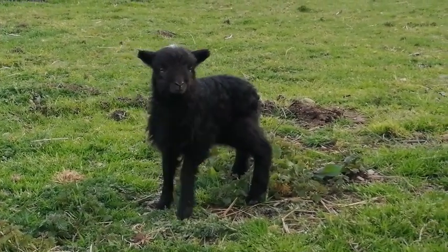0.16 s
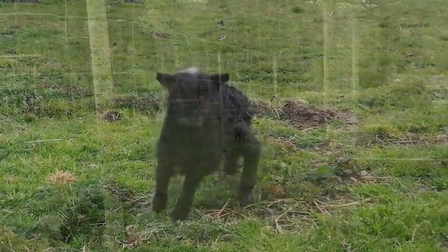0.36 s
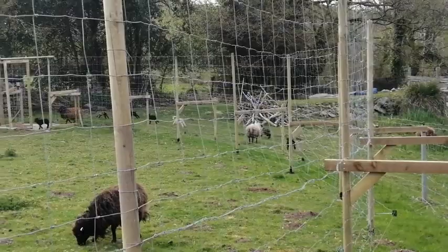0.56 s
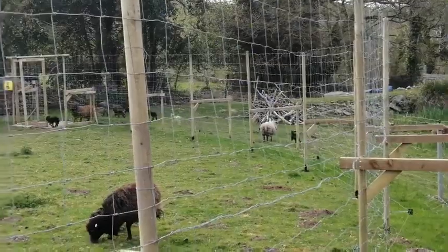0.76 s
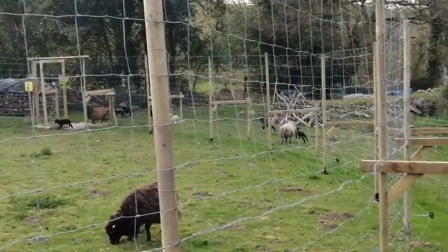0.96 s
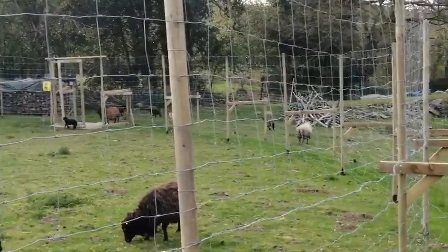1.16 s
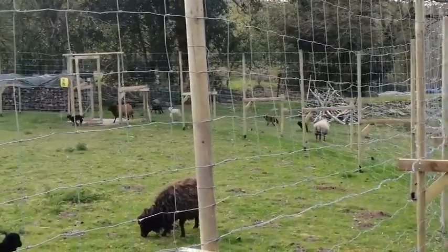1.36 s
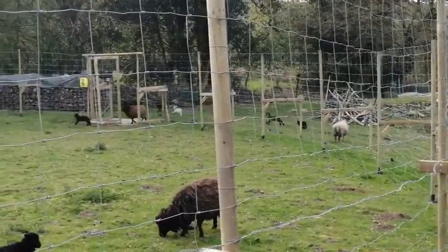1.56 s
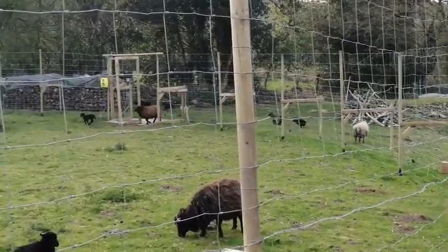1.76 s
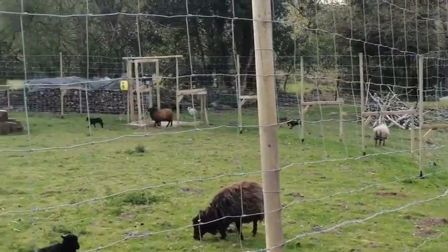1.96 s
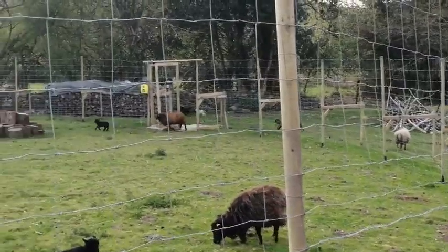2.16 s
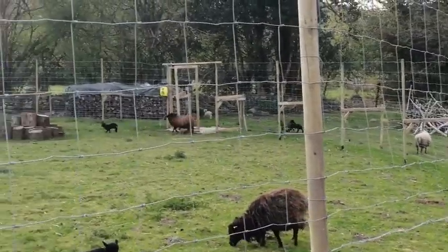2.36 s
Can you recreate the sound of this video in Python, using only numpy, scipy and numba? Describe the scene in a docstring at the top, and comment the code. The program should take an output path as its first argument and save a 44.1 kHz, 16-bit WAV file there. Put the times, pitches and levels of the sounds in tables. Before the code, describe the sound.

A lamb bleats once close to the microphone from about 0.2 to 1 second, a fast quavering call that starts rough and clears. From 1.1 seconds to the end at 2.5, two distant sheep answer faintly, overlapping. A small bird sings thin falling whistles from 1.3 seconds, with four quick repeated notes between 1.8 and 2.3. Soft microphone bumps and a quiet outdoor rush and hiss lie underneath.

```python
"""A lamb close to the microphone in a pasture gives one long quavering bleat: pulses of its vocal folds
ring in chest and mouth under a throat squeal, swelling and sagging about thirteen times a second.
Then two sheep answer faintly from far off and a small bird sings falling whistles from the trees.
Soft low bumps of the hand-held microphone sit on a quiet outdoor rush and hiss."""
import sys
import numpy as np
from scipy import signal
from scipy.fft import rfft, irfft, next_fast_len
from scipy.io import wavfile
from scipy.ndimage import map_coordinates
from numba import njit

SR = 44100
rng = np.random.default_rng(int(sys.argv[2]) if len(sys.argv) > 2 else 0)


def int16_out(signal):
    """Quantize to a 16-bit WAV file."""
    q = np.round(np.clip(np.atleast_2d(signal).T, -1, 1) * 32767)
    wavfile.write(sys.argv[1], SR, q.astype(np.int16))


N = 112455


def amp(db):
    return 10 ** (np.asarray(db) / 20)


def unit(x):
    return x / np.sqrt(np.mean(x ** 2) + 1e-20)


def clock():
    return np.arange(N) / SR


def bell(centre, width):
    """A smooth hump in time, down to 1/e at width seconds from its centre."""
    return np.exp(-((clock() - centre) / width) ** 2)


def curves(rows, t):
    """Each column after the first, read at times t."""
    times, *columns = np.transpose(rows)
    return [np.interp(t, times, column) for column in columns]


def wobble(rate):
    """A smooth random curve, rate knots a second."""
    return map_coordinates(rng.standard_normal(int(N * rate / SR) + 4), [clock() * rate])


def filtered(x, response):
    """x with its spectrum multiplied by response(hz)."""
    size = 2 * next_fast_len(N)
    return irfft(rfft(x, size) * response(np.fft.rfftfreq(size, 1 / SR)), size)[:N]


def colour(x, points):
    """Causal filter through (frequency [Hz], gain [dB]) points; the result has rms 1."""
    def response(hz):
        knots, db = np.transpose(points)
        cepstrum = irfft(np.log(amp(np.interp(np.log(hz + 1), np.log(knots), db))))
        half = len(cepstrum) // 2
        cepstrum[1:half] *= 2
        cepstrum[half + 1:] = 0
        return np.exp(rfft(cepstrum))
    return unit(filtered(x, response))


def noise(spectrum):
    return colour(rng.standard_normal(N), spectrum)


def echo(x, t60):
    """A diffuse outdoor tail that falls 60 dB in t60 seconds."""
    t = np.arange(SR // 2) / SR
    tail = rng.standard_normal(len(t)) * amp(-60 * t / t60) * (t > .004)
    return signal.fftconvolve(x, tail / np.linalg.norm(tail))[:N]


def pasture():
    """All round the microphone: a low outdoor rush, an uneven rumble and a high hiss."""
    # spectra of rush, hiss and rumble (frequency [Hz], gain [dB])
    rush_spectrum = [(25, -16), (50, -12.5), (100, -4), (170, -2.5), (270, 1.5), (400, -3), (600, -0.5),
                     (900, -6), (1200, -10), (1800, -11), (2500, -9), (3300, -7.5), (3900, -16),
                     (5000, -40)]
    hiss_spectrum = [(2000, -26.5), (3300, 0.5), (4000, -4.5), (4800, 0.5), (5700, 7), (6600, 3.5),
                     (7400, -13.5), (7900, -28.5)]
    rumble_spectrum = [(15, -3.5), (45, -10), (100, -6.5), (200, -20), (500, -57.5)]
    # level of the background rush and hiss: duller for the first 0.17 s, then the hiss steps up
    # and drifts gently (time [s], relative level [dB])
    rush_level = [(0, -49.5), (.17, -49), (.3, -46), (.85, -48.5), (1.05, -49), (1.25, -49.5), (1.6, -47),
                  (2.0, -48.5), (2.3, -48.5), (2.46, -47.5), (2.55, -47.5)]
    hiss_level = [(0, -65), (.16, -66.5), (.3, -56.5), (1.05, -57.5), (1.35, -54), (2.2, -56),
                  (2.55, -55.5)]
    rush = noise(rush_spectrum) * amp(curves(rush_level, clock())[0] - 4 + .92 * wobble(10.16))
    rumble = noise(rumble_spectrum) * amp(-74 + 4 * wobble(14))
    hiss = noise(hiss_spectrum) * amp(curves(hiss_level, clock())[0] + 1.2 * wobble(13))
    return rush + rumble + hiss


def microphone_bumps():
    """The hand on the microphone: soft low thuds of a few cycles, and dull rustles."""
    # thuds (time [s], frequency [Hz], half length [s], level [dB])
    bumps = [(0.185, 45, 0.016, -66), (0.519, 68.4, 0.02, -54.5), (0.998, 170, 0.0079, -44),
             (1.325, 150, 0.031, -48.5), (1.55, 116, 0.018, -51), (1.63, 127, 0.013, -48),
             (1.662, 116, 0.0086, -44), (2.385, 196, 0.033, -55), (2.469, 59, 0.0068, -52)]
    # rustles (time [s], half length [s], level [dB])
    rustles = [(1.196, 0.098, -54.5), (1.323, 0.055, -63), (1.456, 0.07, -53), (2.462, 0.031, -55)]
    # their spectrum (frequency [Hz], gain [dB])
    rustle_spectrum = [(100, -18), (200, -3), (330, -2.5), (420, -8), (520, 2.5), (660, -12.5), (850, -27),
                       (2000, -24), (6000, -47.5)]
    thuds = np.zeros(N)
    for at, hz, width, db in bumps:
        phase = 2 * np.pi * hz * (clock() - at) + .83 * wobble(70)
        thuds += np.sqrt(2) * amp(db) * bell(at, width) * np.sin(phase)
    return thuds + noise(rustle_spectrum) * sum(amp(db) * bell(at, width) for at, width, db in rustles)


def quaver():
    """Each swell lifts the level, bends the pitch and pulls the throat's ring down."""
    # swells of the bleat (centre [s], stretch [ratio], pitch shift [Hz], chest [dB], mouth [dB],
    # ring [dB], sizzle [dB], ring frequency at the centre [Hz])
    swells = [(.221, 0.95, 0, -23, -23, -29.5, -40.5, 3020), (0.299, 0.92, -1, -22, -23, -26, -40.5, 3010),
              (0.374, 0.9, 0, -24.5, -23.5, -30.5, -47.5, 2900),
              (0.451, 0.9, 1, -24.5, -24, -28.5, -50.5, 2730),
              (.527, 0.886, 1.5, -25, -23, -28, -48.5, 2712),
              (.603, 0.86, -1.5, -24, -26, -37.5, -54, 2400),
              (0.625, 0.54, -9.5, -23.5, -39.5, -50, -61, 3193),
              (0.690, 1.104, -1.5, -23.5, -27, -28.5, -54.5, 2620),
              (0.769, 0.91, 0.5, -23, -31.5, -30, -51, 2659),
              (0.854, 1.037, -2, -25, -30, -30.5, -53.5, 3048),
              (.933, 0.83, -1.5, -25, -29.5, -30, -55.5, 2959),
              (0.983, 0.45, 3.5, -34, -48.5, -51, -59, 3150)]
    # shape of one swell (time from centre [s], chest [dB], mouth [dB], ring and sizzle [dB])
    swell_shape = [(-.040, -38.5, -24.5, -18), (-.033, -25, -12.5, -10.5), (-.027, -13, -9, -7),
                   (-.019, -13.5, -5.5, -13.5), (-.010, -2.5, -3, 1), (.002, -2, -1, 0.5),
                   (0.012, -2.5, -2.5, 0.5), (.022, -16.5, -16.5, -7.5), (.036, -21.5, -25.5, -25.5)]
    # pitch through one swell (time from centre [s], pitch [Hz])
    scoop = [(-.04, 210), (-.028, 207), (-.018, 215), (-.008, 225), (.002, 232), (.011, 227), (.022, 216),
             (.036, 221)]
    ring_top_hz, ring_dip_s, cut_db_per_s = 3616, .027, 1490.5
    gains = np.zeros((4, N))
    pitch_sum, ring_sum, weight_sum = np.zeros((3, N))
    for centre, stretch, shift_hz, chest_db, mouth_db, ring_db, sizzle_db, dip_hz in swells:
        t = (clock() - centre) / stretch
        chest, mouth, ring = curves(swell_shape, t)
        band_db = np.array([chest + chest_db, mouth + mouth_db, ring + ring_db, ring + sizzle_db])
        outside = np.abs(t - np.clip(t, swell_shape[0][0], swell_shape[-1][0]))
        cut_db = -cut_db_per_s * outside  # the voice dies fast outside a swell
        gains = np.maximum(gains, amp(band_db + cut_db))
        weight = amp(mouth + cut_db) ** 2 + 1e-12  # neighbouring swells blend their frequencies
        pitch_sum += weight * (curves(scoop, t)[0] + shift_hz)
        ring_sum += weight * (ring_top_hz + (dip_hz - ring_top_hz) * np.exp(-(t / ring_dip_s) ** 2))
        weight_sum += weight
    return gains, pitch_sum / weight_sum, ring_sum / weight_sum


def folds(cycles, rough, jitter_s=.000014, scatter_db=1.2):
    """Vocal folds: one uneven pulse per cycle, plus gated air noise with the share rough of the power."""
    closures = np.interp(np.arange(1, int(cycles[-1])), cycles, np.arange(N))
    chance = rng.standard_normal((len(closures), 2))
    closures += jitter_s * SR * chance[:, 0]
    taps = closures.astype(int)[:, None] + np.arange(-8, 9)
    shapes = np.sinc(taps - closures[:, None]) * amp(scatter_db * chance[:, 1:])
    pulses = np.bincount(np.clip(taps, 0, N - 1).ravel(), shapes.ravel(), N)
    air = rng.standard_normal(N) * np.exp(-2.2 * (cycles % 1))
    return np.sqrt(1 - rough) * unit(pulses) + np.sqrt(rough) * unit(air)


def mouth_vowel(voice):
    """The mouth changes shape mid-bleat and shades one vowel towards another."""
    # resonances of the two vowels (frequency [Hz], gain [dB])
    early_vowel = [(500, -70), (1300, -46.5), (1750, -11.5), (2000, 3.5), (2250, 16.5), (2420, 0),
                   (2560, 8), (2800, 0.5), (3500, -10), (4200, -36.5), (6000, -76.5)]
    late_vowel = [(500, -85), (1300, -48.5), (1750, -4.5), (2050, 8.5), (2280, 1.5), (2550, 15.5),
                  (2800, -3.5), (3400, -33), (4200, -28.5), (6000, -56)]
    # change of shape (time [s], share of the late vowel [0-1])
    vowel_change = [(.55, 0.0058), (.68, 0.42)]
    late, = curves(vowel_change, clock())
    return (1 - late) * colour(voice, early_vowel) + late * colour(voice, late_vowel)


@njit
def resonate(x, angle, radius):
    """A two-pole resonance whose centre, angle in radians per sample, moves."""
    y = np.zeros(len(x))
    for i in range(2, len(x)):
        y[i] = x[i] * np.sin(angle[i]) + 2 * radius * np.cos(angle[i]) * y[i - 1] - radius**2 * y[i - 2]
    return y


def squeal(hz, cycles, wander=.012, bend_rad=1.0, pulse_depth=.2, top_hz=3680):
    """A second, whistling oscillation in the throat; the folds shake it into sidebands."""
    shake = np.sin(2 * np.pi * cycles)
    phase = 2 * np.pi * np.cumsum(hz * (1 + wander * wobble(500))) / SR
    tone = unit(np.sin(phase + bend_rad * shake) * (1 + pulse_depth * shake))
    return filtered(tone, lambda f: 1 / np.sqrt(1 + (f / top_hz) ** 20))


def bright_ring(hz, cycles, rough, width_hz=340, squeal_share=.72):
    """The folds ring a gliding resonance, and the squeal follows the same frequency."""
    # band of the ring (frequency [Hz], gain [dB])
    ring_band = [(1000, -33.5), (2200, -20.5), (2700, 0), (3200, 9.5), (3600, 10), (4000, -4),
                 (4600, -21.5), (6000, -52.5)]
    ring = resonate(folds(cycles, rough), 2 * np.pi * hz / SR, np.exp(-np.pi * width_hz / SR))
    bright = np.sqrt(1 - squeal_share) * colour(ring, ring_band)
    bright += np.sqrt(squeal_share) * squeal(hz, cycles)
    return bright * amp(1.2 * wobble(90))


def rasp(cycles):
    """Thin breathy rasps among the later swells."""
    # rasps (time [s], standard deviation in time [s], level [dB])
    rasps = [(0.548, 0.005, -41.5), (0.622, 0.005, -33), (0.658, 0.012, -38), (0.727, 0.0057, -37),
             (0.821, 0.016, -47), (0.966, 0.01, -45)]
    # their spectrum (frequency [Hz], gain [dB])
    rasp_spectrum = [(2400, -23.5), (3200, 2), (3600, -3), (4100, -7), (4500, -25.5), (5500, -27),
                     (7000, -41.5)]
    envelope = sum(amp(db) * bell(at, np.sqrt(2) * spread) for at, spread, db in rasps)
    return colour(folds(cycles, rough=.78), rasp_spectrum) * envelope


def chest_tone(cycles):
    """Nearly clean pulses resonate in the chest, above a soft fundamental."""
    # chest resonances (frequency [Hz], gain [dB])
    chest_spectrum = [(100, -61.5), (240, -50), (330, -38.5), (460, -37.5), (560, -36), (690, -14),
                      (800, 1), (900, 0.5), (950, 7.5), (1100, -34.5), (1350, -34), (1600, -25.5),
                      (2000, -38.5), (4000, -81.5)]
    # lowest harmonic (time [s], level relative to the chest band [dB])
    fundamental_level = [(.22, -21), (.45, -14.5), (.95, -14)]
    fundamental = np.sqrt(2) * amp(curves(fundamental_level, clock())[0]) * np.sin(2 * np.pi * cycles)
    return colour(folds(cycles, rough=.012), chest_spectrum) + fundamental


def lamb(ground_db=-8.5):
    """The close bleat starts rough and clears; its upper bands scatter off the ground."""
    # breath in mouth and ring (time [s], noise share [0-1])
    roughness = [(.2, .28), (.33, .18), (.45, .07), (.7, .03), (.95, .07)]
    # breathy top of the voice (frequency [Hz], gain [dB])
    sizzle_spectrum = [(2500, -60.5), (4300, -2.5), (5200, -8), (6100, 11), (6700, 7), (7200, 8),
                       (7800, -33.5)]
    # the voice catches and its upper bands drop out (time [s], half length [s], depth [dB])
    catches = [(0.223, 0.0064, 7.5), (0.301, 0.0052, 21), (0.379, .003, 10), (0.512, 0.0014, 15.5),
               (.534, 0.0036, 9.5)]
    (chest_gain, mouth_gain, ring_gain, sizzle_gain), pitch_hz, ring_hz = quaver()
    cycles = np.cumsum(pitch_hz * (1 + .005 * wobble(150))) / SR
    rough, = curves(roughness, clock())
    mouth = mouth_gain * mouth_vowel(folds(cycles, rough))
    ring = ring_gain * bright_ring(ring_hz, cycles, rough)
    sizzle = sizzle_gain * colour(folds(cycles, rough=.99), sizzle_spectrum)
    catch = amp(-sum(db * bell(at, width) for at, width, db in catches))
    upper = catch * (mouth + ring + sizzle) + rasp(cycles)
    return chest_gain * chest_tone(cycles) + upper + amp(ground_db) * echo(upper, t60=.01)


def far_call(call, harmonics, flutter_db):
    """A distant call of which only a few harmonics carry; gives its sound and its phase."""
    hz, db = curves(call, clock())
    phase = 2 * np.pi * np.cumsum(hz * (1 + .004 * wobble(30))) / SR
    sound = sum(amp(db + gain + flutter_db * wobble(25.02)) * np.sin(k * phase) for k, gain in harmonics)
    return sound, phase


def far_sheep(flutter_db=3.2, trees_db=-5):
    """Two overlapping answers from far off, blurred by trees; the longer also carries a low harmonic."""
    # the two calls (time [s], pitch [Hz], level [dB])
    short_call = [(1.12, 272, -76), (1.19, 273, -62), (1.3, 269, -61), (1.37, 270, -67), (1.44, 269, -61),
                  (1.51, 264, -56), (1.6, 262, -72)]
    long_call = [(1.42, 300, -70), (1.51, 307, -55), (1.62, 311, -60), (1.75, 317, -57), (1.92, 318, -55.5),
                 (2.05, 317, -58), (2.22, 310, -58), (2.36, 298, -56.5), (2.5, 290, -72)]
    # their strong harmonics (harmonic [number], gain [dB])
    short_harmonics = [(10, -7), (12, 0)]
    long_harmonics = [(7, -15), (8, -14), (9, -8), (10, -3), (11, -3)]
    # third harmonic of the long call (time [s], level [dB])
    low_level = [(1.56, -76), (1.68, -58), (1.85, -55), (1.98, -64), (2.1, -61), (2.2, -61), (2.3, -78)]
    answer, phase = far_call(long_call, long_harmonics, flutter_db)
    low_gain = amp(curves(low_level, clock())[0] + flutter_db * wobble(25))
    low = low_gain * np.sin(3 * phase + .56 * wobble(60))
    calls = answer + far_call(short_call, short_harmonics, flutter_db)[0]
    return low + calls + amp(trees_db) * echo(calls, t60=.65)


def whistle(glide, at=0, db=0, flutter_db=2.5, fade_s=.0036):
    """One bird note: a gliding, slightly fluttering sine."""
    t = clock() - at
    hz, level = curves(glide, t)
    gate = np.clip(np.minimum(t - glide[0][0], glide[-1][0] - t) / fade_s, 0, 1)
    envelope = gate * amp(db + level + flutter_db * wobble(200))
    phase = 2 * np.pi * np.cumsum(hz * (1 + .0039 * wobble(400))) / SR
    return np.sqrt(2) * envelope * np.sin(phase)


def bird(bounce_s=.0049, bounce_db=-15.5):
    """Thin whistles and four hooked notes; a late bounce off ground and trees makes them flutter."""
    # single whistles, each a list of (time [s], frequency [Hz], level [dB])
    whistles = [
        [(1.265, 5700, -48.5), (1.278, 6550, -55.5), (1.292, 6400, -58)],
        [(1.402, 5680, -60), (1.412, 5560, -45), (1.430, 5434, -40.5), (1.447, 5340, -44.5), (1.462, 5330, -70)],
        [(1.510, 4480, -70), (1.532, 4280, -57), (1.548, 4030, -54)],
        [(1.630, 7720, -70), (1.655, 7180, -51.5), (1.675, 6480, -44), (1.688, 6420, -36.5), (1.698, 6250, -48)],
        [(1.720, 6700, -69), (1.730, 5680, -37.5), (1.737, 4810, -60.5), (1.752, 4140, -62)],
        [(2.395, 8000, -58), (2.415, 7100, -60), (2.435, 7170, -43.5), (2.495, 7080, -44.5), (2.525, 7040, -45),
         (2.55, 6900, -54)],
    ]
    # the hooked note (time from its peak [s], frequency [Hz], relative level [dB])
    hooked_note = [(-.053, 5310, -30), (-.048, 5714, -13), (-.041, 6740, -18.5), (-.033, 6550, -31.5),
                   (-.018, 6100, -27.5), (-.007, 5850, -11), (0, 5590, 1.5), (.006, 5350, -16),
                   (.016, 4660, -16.5), (.024, 4290, -23.5), (.040, 3540, -30.5)]
    # its repeats (time [s], level [dB])
    repeats = [(1.849, -33), (1.994, -31), (2.131, -31), (2.270, -31.5)]
    song = sum(whistle(hooked_note, at, db) for at, db in repeats)
    song += sum(whistle(glide) for glide in whistles)
    return song + amp(bounce_db) * np.interp(clock() - bounce_s, clock(), song)


def scene(field_db=-20, trees_db=-14):
    """From one spot in the pasture: the near lamb trails over the grass, the bird rings in the trees."""
    bleat, song = lamb(), bird()
    close_by = bleat + amp(field_db) * echo(bleat, t60=.3)
    in_trees = song + amp(trees_db) * echo(song, t60=.23)
    return (close_by + in_trees + far_sheep() + microphone_bumps() + pasture())[None]


def record(dry, top_hz=7700, edge_hz=400):
    """One mono microphone; the treble ends steeply around top_hz."""
    return filtered(dry[0], lambda hz: np.clip((top_hz - hz) / edge_hz + .5, 0, 1) ** 2)[None]


dry = scene()
out = record(dry)
int16_out(out)
```